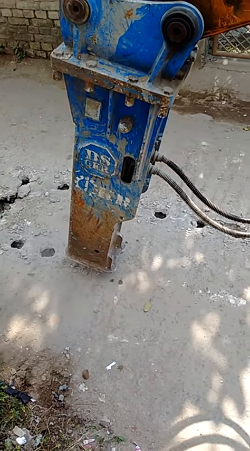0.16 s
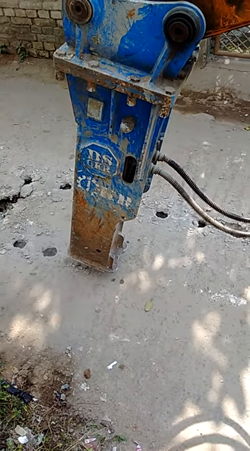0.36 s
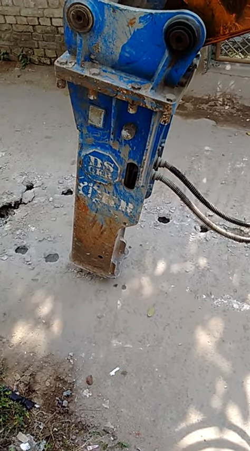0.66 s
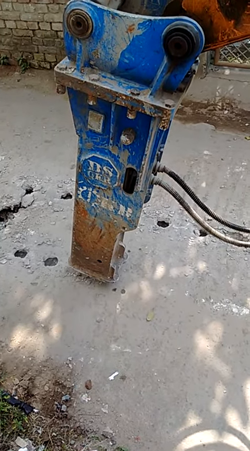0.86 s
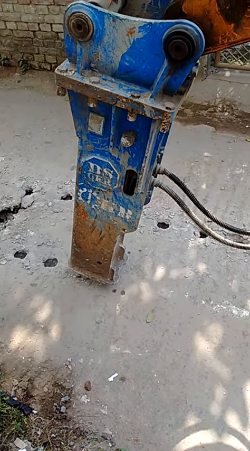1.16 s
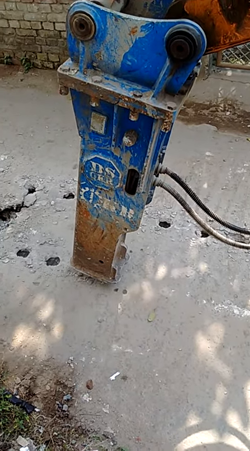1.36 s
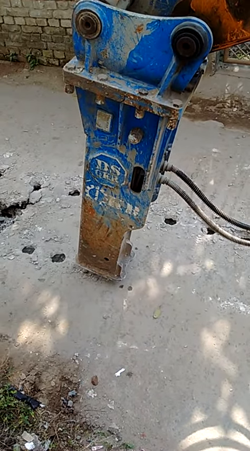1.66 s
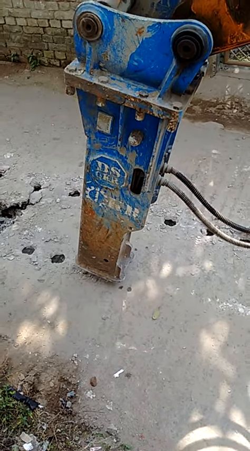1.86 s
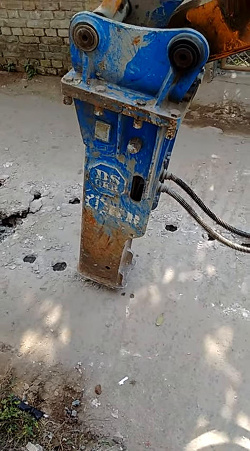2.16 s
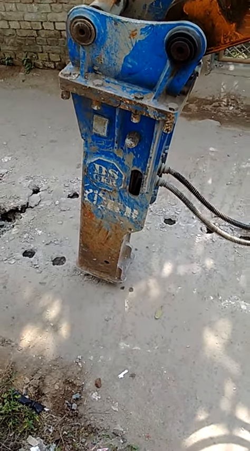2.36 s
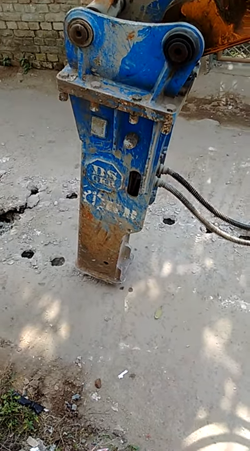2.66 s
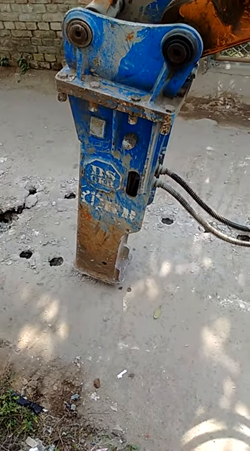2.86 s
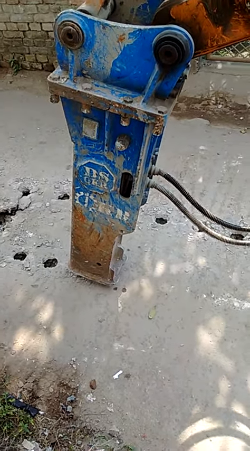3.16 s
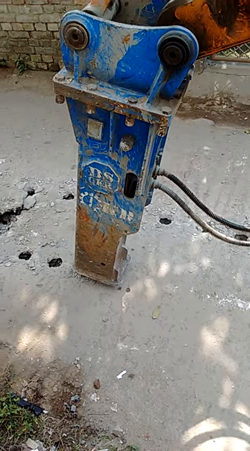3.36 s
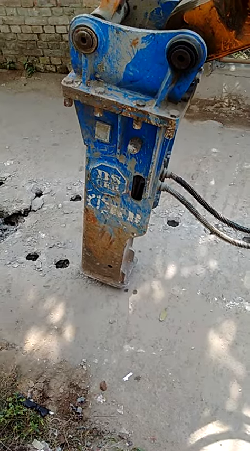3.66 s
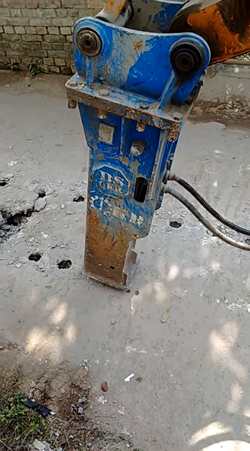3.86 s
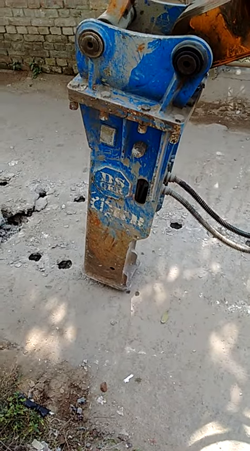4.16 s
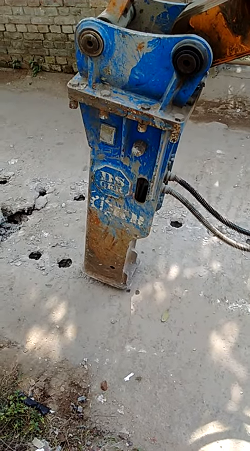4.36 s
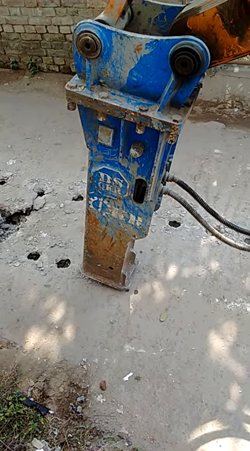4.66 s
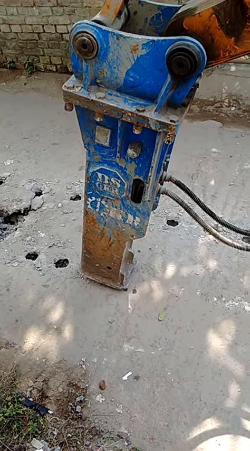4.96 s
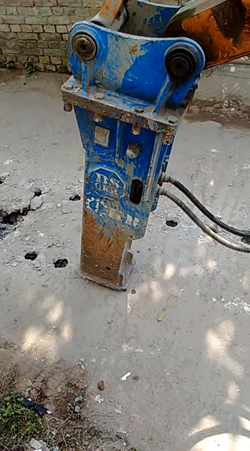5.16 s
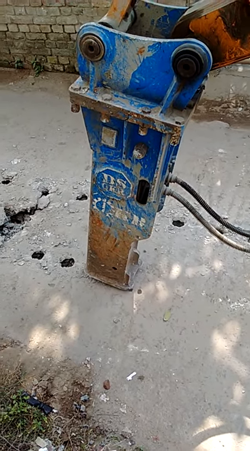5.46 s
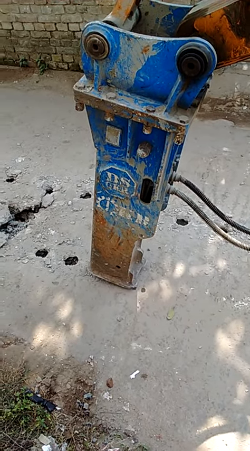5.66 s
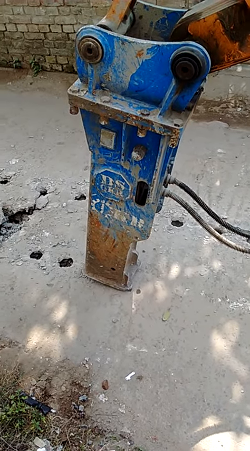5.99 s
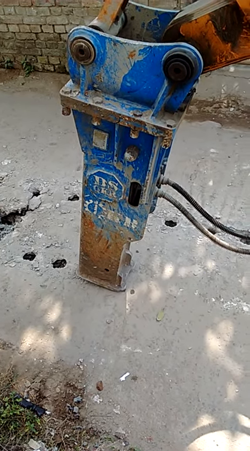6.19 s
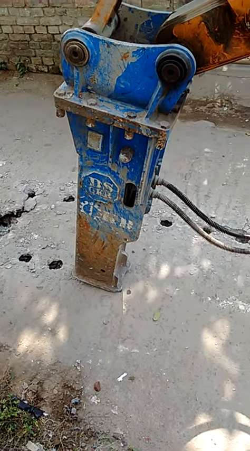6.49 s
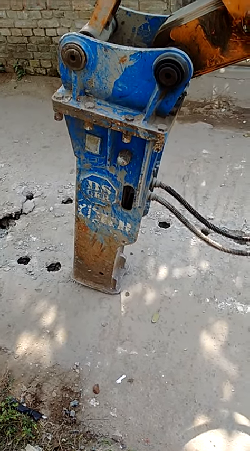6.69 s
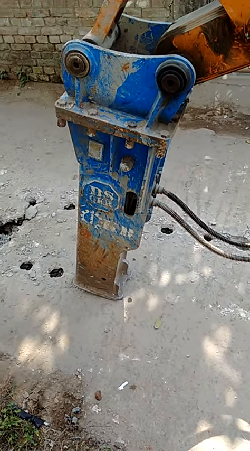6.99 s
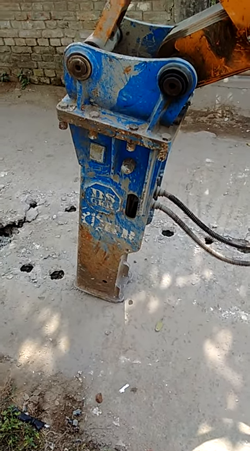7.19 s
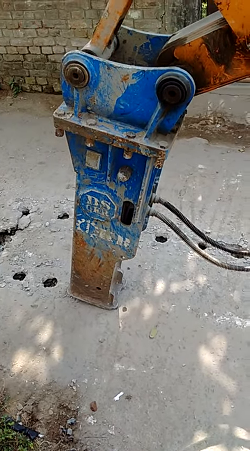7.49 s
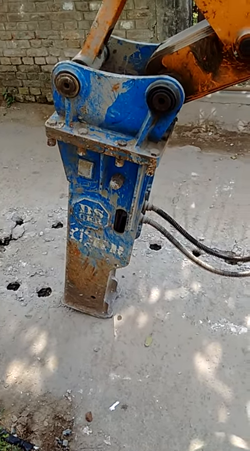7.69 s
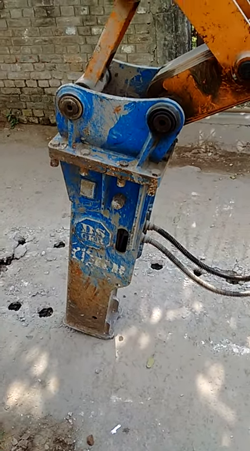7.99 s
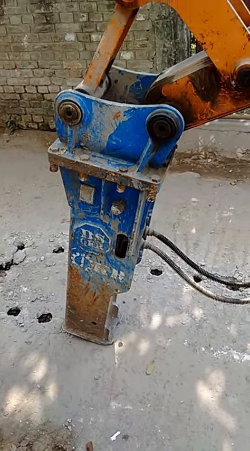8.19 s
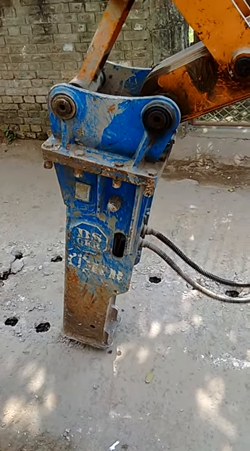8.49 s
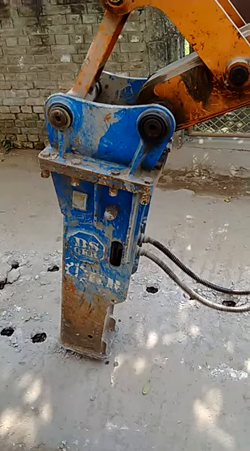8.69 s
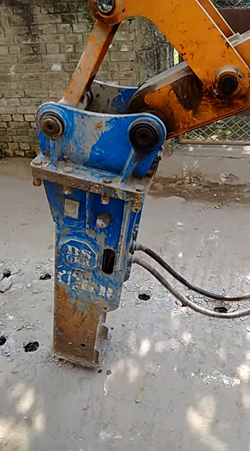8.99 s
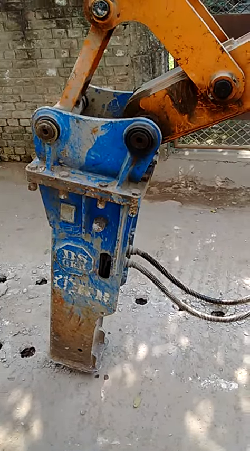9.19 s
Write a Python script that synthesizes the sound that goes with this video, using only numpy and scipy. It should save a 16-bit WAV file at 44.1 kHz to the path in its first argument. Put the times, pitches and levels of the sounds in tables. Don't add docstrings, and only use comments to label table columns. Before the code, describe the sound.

A rapid, steady stream of pounding metal-on-concrete blows starts at once, loud, rough and slightly distorted, with clanging housing and a wavering steel ring. It ends abruptly around seven seconds, uncovering a low humming engine. Slack pins knock, plates ring faintly, then a cluster of heavy thumps and a gritty chisel drag follows before only the drone remains. Close phone pickup, wide stereo, beside a brick wall.

```python
import sys
import numpy as np
from scipy import signal
from scipy.fft import rfft, irfft, next_fast_len
from scipy.io import wavfile
from scipy.ndimage import uniform_filter1d

SR = 44100
rng = np.random.default_rng(int(sys.argv[2]) if len(sys.argv) > 2 else 0)


def pcm_store(signal):
    levels = np.round(np.clip(np.atleast_2d(signal), -1, 1) * 32767)
    wavfile.write(sys.argv[1], SR, levels.astype(np.int16).T)


def voltage_ratio(decibels):
    exponent = np.asarray(decibels, float) / 20
    return 10 ** exponent


N = 411894

# [top edge f/Hz, level/dB, rise/s, t60/s, chatter exponent]
RATTLE_BANDS = [
    (501, 1.5, 0.0032, 0.17, 2.5),
    (1468, -1, 0.0025, 0.21, 1),
    (2530, -5.5, 0.00048, 0.2, 2),
    (6460, -2.5, 0.0031, 0.16, -0.8),
    (16400, -11, 0.0023, 0.14, 4.5),
]
PACE_S = [0.0195, 0.4491, 1.3013, 1.8704, 2.286, 2.5673, 2.7169, 2.8617, 3.0244, 3.5992, 3.8788, 4.4342,
          4.8526, 4.9906, 5.1406, 5.3033, 5.452, 5.5962, 6.0154, 6.153, 7.131]


def evened(x):
    return x / np.sqrt(np.mean(x ** 2) + 1e-20)


def smooth_noise(size, span):
    return evened(uniform_filter1d(rng.standard_normal(size), span))


def read(points, hz, axis=1):
    rows = np.array(points)
    return np.interp(np.log(hz + 1), np.log(rows[:, 0] + 1), rows[:, axis])


def add(mix, s, sound):
    part = mix[:, max(round(s * SR), 0):][:, :sound.shape[1]]
    part += sound[:, :part.shape[1]]


def coloured(size, points, tilt_db=0.):
    hz = np.fft.rfftfreq(size, 1 / SR)
    gain = voltage_ratio(read(points, hz) + tilt_db * np.log2((hz + 50) / 1000))
    return evened(irfft(rfft(rng.standard_normal((2, size))) * gain, size))


def bands(x):
    hz, z = np.fft.rfftfreq(x.shape[1], 1 / SR), rfft(x)
    edges = [0] + [row[0] for row in RATTLE_BANDS]
    return [evened(irfft(z * ((hz >= lo) & (hz < hi)), x.shape[1])) for lo, hi in zip(edges, edges[1:])]


def struck(t, rise_s, t60_s):
    return (1 - np.exp(-t / max(rise_s, 1e-4))) * voltage_ratio(-60 * t / t60_s)


def lumps(size, depth_db, span_s):
    span = int(span_s * SR)
    once = uniform_filter1d(rng.standard_normal(size), span)
    return voltage_ratio(depth_db * evened(uniform_filter1d(once, span)))


def ring(kicks, hz, t60_s):
    pole = voltage_ratio(-60 / (t60_s * SR)) * np.exp(2j * np.pi * hz / SR)
    return signal.lfilter([1], [1, -pole], kicks).imag


def blows():
    # [t/s, strength/dB, crumble/dB re strength, arm ring/dB re strength]
    bite = [(0, -17, -1.5, -23), (0.3, -15.5, -1.5, -30), (0.9, -16.5, -0.5, -24), (1.7, -17, 2, -40),
            (1.87, -15, 1.2, -18), (2.43, -15.5, 2, -14), (2.7, -16.5, 2.5, -16.5),
            (2.86, -17.5, -0.5, -13), (3.3, -17.5, 0, -16.5), (3.6, -13.5, -2.5, -16), (4.71, -14, -3, -17),
            (4.86, -14, -3, -36), (5.14, -16, -2.5, -30), (5.45, -14, -3, -24), (5.6, -13.5, -3.5, -15),
            (6.43, -16, -2, -19), (7.13, -14.1, -4, -22.5)]
    stroke_s = 0.142
    strokes = np.cumsum(np.append(0, np.round(np.diff(PACE_S) / stroke_s)))
    s = np.interp(np.arange(strokes[-1] + 1), strokes, PACE_S)
    at, *controls = np.transpose(bite)
    db, crumble_db, boom_db = (np.interp(s, at, c) for c in controls)
    luck = rng.standard_normal((len(s), 3)).T
    thud_db = -17.5 - 0.5 * s - db - 1.17 * luck[0]
    pinned_s, pinned_db_per_s = 6.18, -4.5
    plates_db = -0.17 + 0.9 * crumble_db + pinned_db_per_s * np.maximum(s - pinned_s, 0) + luck[1]
    return np.transpose([s, db, thud_db, plates_db, crumble_db, boom_db + 3 * luck[2]])


def rattle(rows):
    # [f/Hz, level/dB per Hz]
    shudder_colour = [(40, -7.5), (90, -2.5), (160, 0.5), (300, 3), (500, -2), (900, -2), (1500, -8),
                      (2000, -11), (2600, -15.5), (4000, -20.5), (6000, -24), (9000, -25.5), (12000, -29.5),
                      (15000, -29)]
    # [f/Hz, level/dB, peak t/s, half length/s]
    contact = [
        (1900, 0, .0018, .0013),
        (3200, -5, .001, .001),
        (330, -3, .0035, .0022),
        (65, -21, .013, .009),
    ]
    out, size = np.zeros((2, N)), 8192
    t = np.arange(size) / SR
    habit, habit_lumps = coloured(size, shudder_colour), lumps(size, 0.87, 0.0012)
    fade = np.minimum(5 * (1 - t / t[-1]), 1)
    for s, db, thud_db, plates_db, crumble_db, _ in rows:
        layers = bands(0.53 * habit + 0.91 * coloured(size, shudder_colour))
        shares_db = thud_db, plates_db, 0, 1.07 * crumble_db, crumble_db
        slower = voltage_ratio(0.84 * (crumble_db + 7))
        chatter = lumps(size, 0.4, 0.0025)
        shudder = np.zeros((2, size))
        for x, share_db, (_, band_db, rise_s, t60_s, depth_db) in zip(layers, shares_db, RATTLE_BANDS):
            shudder += voltage_ratio(share_db + band_db) * x * struck(t, rise_s, t60_s * slower) * chatter ** depth_db
        crack = np.zeros((2, size))
        for hz, part_db, at, half in contact:
            level = voltage_ratio(part_db + 2.0 * rng.standard_normal())
            phase = 2 * np.pi * hz * rng.uniform(0.95, 1.06) * (t - at) + [[0], [1.2]]
            crack += level * np.cos(phase) * np.exp(-((t - at) / half) ** 2)
        crack_db = db + 3.5 - .9 * crumble_db + .3 * s
        add(out, s - .0007, voltage_ratio(db + 3.5) * shudder * habit_lumps * fade + voltage_ratio(crack_db) * crack)
        puff = voltage_ratio(-48) * layers[2] + voltage_ratio(-11.5) * layers[3] + voltage_ratio(-16.0) * layers[4]
        add(out, s - .025, voltage_ratio(db) * puff[::-1] * struck(t, 0.003, 0.21))
    return out


def steel(rows):
    # [f/Hz, level/dB, t60/s, freest at t/s]
    steel_modes = [(248, -11, .25, 2.5), (295, -8, .2, 1.8), (334, -9, .25, 1), (397, -9, .33, 3.7),
                   (656, -7, .3, .6), (740, -7, .2, 1.1), (834, -8, .45, .7), (921, -6, .27, 1.6),
                   (1131, -8, .25, 3.2), (1126, -8, .28, 5.5), (1250, -8, .2, 5.9), (1455, -12, .2, 5.4),
                   (1630, -14, .2, 2),
                   (1725, -13, .2, 2.6), (1825, -9, .3, 1.5), (1958, -7.5, .2, 5.2), (2010, -14, .15, 2.3),
              (2300, -14, .15, 1), (3165, -19, .15, .4), (3740, -18, .15, 2.1), (4118, -18, .15, 2.1),
              (4581, -19, .15, 2.3), (7919, -28, .2, 2.2), (8635, -29, .3, 5), (9778, -25, .4, 3.5),
              (11590, -34, .4, 4.5), (13050, -36, .3, 4.5)]
    # [f/Hz, level/dB, wander/Hz]
    boom = (588, 3, 3.5)
    s, db, _, plates_db, _, boom_db = rows.T
    out = np.zeros((2, N))
    damped_db, free_db, free_s = -3, 7.5, 0.84
    for hz, mode_db, t60_s, freest_s in steel_modes:
        kicks = np.zeros((2, N), complex)
        drift_db = 1.3 * smooth_noise(len(s), 4)
        seating_db = damped_db + free_db * np.exp(-((s - freest_s) / free_s) ** 2 / 2) + drift_db
        shake_db = .7 * plates_db * (hz < 1400)
        for delay_s, bounce_db in (.002, -4), (.009, -10.5), (.021, -14.5):
            luck = rng.random((len(s), 3)).T
            height = voltage_ratio(db + 4 + shake_db + mode_db + bounce_db + seating_db + 4 * luck[0])
            kicks[:, ((s + delay_s) * SR).astype(int)] += height * np.exp(2j * np.pi * luck[1:])
        out += ring(kicks, hz, t60_s)
    boom_hz, gain_db, wander_hz = boom
    t = np.arange(N) / SR
    level = np.interp(t, np.append(s + 0.1, s[-1] + 0.35), np.append(voltage_ratio(db + boom_db + gain_db), 0))
    phase = 2 * np.pi * np.cumsum(boom_hz + wander_hz * smooth_noise(N, 6000)) / SR
    return out + level * lumps(N, 4.0, 0.032) * np.sin(phase + [[0], [.7]])


def linkage():
    # [t/s, level/dB, rise/s, t60/s, tilt/dB per octave]
    knocks = [(7.665, -19.5, 0.004, 0.6, -5), (7.825, -30, .005, 0.11, 0.5), (7.985, -28, 0.0043, 0.21, -3),
              (8.25, -17.5, 0.0035, 0.44, -2.5), (8.308, -12, 0.013, 0.32, -1),
              (8.522, -10, 0.0018, 0.11, -14.5), (8.56, -8.5, 0.005, 0.13, -7.5),
              (8.626, -14.5, .003, 0.28, 3.5), (8.754, -18, .004, 0.16, -3), (7.88, -39, 0.0033, 0.18, 7),
              (9.02, -33, 0.0083, .3, 0)]
    # [f/Hz, level/dB per Hz]
    knock_colour = [(60, -29), (150, -4.5), (300, -7), (600, -4), (1000, 1), (1800, -7.5), (3000, -6.5),
                    (5000, -14), (8000, -21), (12000, -27), (15000, -27.5)]
    # [t/s, f/Hz, level/dB, t60/s]
    plates = [(7.73, 312, -28, 4), (7.68, 1240, -30, .2), (7.82, 3596, -44, .8), (7.95, 3596, -42, 3),
              (7.82, 9785, -45, 1.5), (7.82, 9150, -52, .4), (7.79, 7300, -53, .5), (8.255, 820, -22, .2),
              (8.325, 1130, -14, .3), (8.308, 810, -14, .12), (8.33, 1950, -22, .15), (8.7, 330, -30, 1),
              (7.67, 470, -22, .15), (7.68, 1700, -27, .2), (8.33, 3100, -20, .2), (8.41, 3596, -39, .6),
              (8.52, 9785, -40, 1.2), (8.53, 200, -23, .3), (8.755, 597, -31, 1.6), (8.755, 1000, -20, .15),
              (8.63, 3900, -28, .12), (8.6, 13800, -46, .5), (8.25, 4800, -34, .15), (8.7, 3600, -42, 1.3),
              (8.35, 4800, -35, .2)]
    # [t/s, level/dB, centre f/Hz]
    scrape = [
        (8.52, -3, 251),
        (8.535, -26, 269),
        (8.596, -9, 1380),
        (8.642, -12.5, 2030),
        (8.692, -32, 1530),
        (8.716, -25, 849),
        (8.8, -16.5, 1040),
    ]
    out, t = np.zeros((2, N)), np.arange(22050) / SR
    for s, db, rise_s, t60_s, tilt_db in knocks:
        noise = coloured(len(t), knock_colour, tilt_db)
        add(out, s, voltage_ratio(db + 1.0) * noise * struck(t, rise_s, t60_s) * lumps(len(t), 0.93, 0.0055))
    t = np.arange(SR) / SR
    for s, hz, db, t60_s in plates:
        phase = 2 * np.pi * (hz * t + rng.random() * np.ones((2, 1)))
        add(out, s, voltage_ratio(db) * np.sin(phase) * struck(t, .006, t60_s) * lumps(SR, 1.5, .015) * (1 - t))
    s, db, hz = np.transpose(scrape)
    t = np.arange(s[0], s[-1], 1 / SR)
    grit = coloured(len(t), knock_colour, 1.2)
    turn = np.exp(2j * np.pi * np.cumsum(np.interp(t, s, hz)) / SR)
    r = np.exp(-np.pi * 900 / SR)
    climbing = evened((turn * signal.lfilter([1 - r], [1, -r], grit / turn)).real)
    drag = (.65 * climbing + .75 * grit) * lumps(len(t), 2.2, .003) * signal.windows.tukey(len(t), .15)
    add(out, s[0], voltage_ratio(np.interp(t, s, db) - 7.0) * drag)
    return out


def wall(x):
    t = np.arange(SR // 2) / SR
    tail = rng.standard_normal((2, len(t))) * voltage_ratio(-60 * t / .5) * (t > .012)
    tail = signal.lfilter([.4], [1, -.6], tail)
    return voltage_ratio(-16) * signal.oaconvolve(x, tail / np.linalg.norm(tail[0]), axes=1)[:, :N]


def engine():
    # [t/s, level/dB]
    engine_level = [(0, -40.5), (4, -40.5), (5.6, -32), (7.1, -37), (7.62, -38.5), (7.7, -32.5), (8.2, -33),
                    (8.45, -28), (8.97, -35), (9.05, -33), (9.34, -29)]
    # [f/Hz, level/dB per Hz]
    drone_colour = [(40, -1), (90, -6), (160, 1), (300, -4), (500, -4), (900, -6.5), (1500, -9),
                    (2000, -9.5), (2600, -17.5), (4000, -24.5), (6000, -36), (9000, -37.5), (12000, -41.5),
                    (15000, -44)]
    s, db = np.transpose(engine_level)
    t = np.arange(N) / SR
    _, _, z = signal.stft(coloured(N, drone_colour), SR, nperseg=512)
    patches = uniform_filter1d(rng.standard_normal(z.shape[1:]), 6, 0)
    patches = evened(uniform_filter1d(patches, 12, 1))
    drone = evened(signal.istft(z * voltage_ratio(1.9 * patches), SR, nperseg=512)[1][:, :N])
    drone = drone * lumps(N, 1.16, 0.0079)
    phase = 2 * np.pi * np.cumsum(129.2 + 1.9 * smooth_noise(N, 4000)) / SR
    hum = np.sin(phase + [[0], [.6]]) * lumps(N, 1.8, 0.05)
    hiss = voltage_ratio(-29) * coloured(N, [(6000, -30), (9500, -3), (11000, 0), (15500, -4)])
    hammering_db, after_db, swell_s = -16, -2.5, 0.2
    hum_db = np.interp(t, [PACE_S[-1], PACE_S[-1] + swell_s], [hammering_db, after_db])
    return voltage_ratio(np.interp(t, s, db)) * (voltage_ratio(3.5) * (drone + hiss) + voltage_ratio(hum_db) * hum)


def scene():
    rows = blows()
    machine = rattle(rows) + steel(rows) + linkage()
    return machine + wall(machine) + engine()


def masked(x):
    # [f/Hz, level/dB]
    cell_floor = [(4000, -30), (6000, -8.5), (9500, -11), (10400, -5), (15000, -3.5)]
    # [f/Hz, level/dB]
    patch_floor = [(9000, -75), (9400, -51), (13000, -48), (15500, -43)]
    growth = 1.4
    hz, _, z = signal.stft(np.array([x[0] + x[1], x[0] - x[1]]) / 2, SR, nperseg=1024)
    power = abs(z) ** 2
    around = uniform_filter1d(power.sum(0), size=30, axis=0)
    cell = uniform_filter1d(uniform_filter1d(power, size=3, axis=1), size=2, axis=2)
    keep = cell > around * voltage_ratio(read(cell_floor, hz))[:, None] ** 2
    patch = uniform_filter1d(uniform_filter1d(power, size=9, axis=1), size=2, axis=2)
    loudness = uniform_filter1d(power.sum((0, 1)), size=10)
    keep &= patch > loudness ** growth * voltage_ratio(read(patch_floor, hz))[:, None] ** 2
    mid, side = signal.istft(z * keep * (hz < 15650)[:, None], SR, nperseg=1024)[1][:, :N]
    return np.array([mid + side, mid - side])


def band_limit(x):
    return signal.sosfilt(signal.butter(12, 15650, fs=SR, output="sos"), x)


def record(dry):
    # [f/Hz, right re left/dB, likeness 0-1, share cancelled from the other side]
    capsules = [(60, -4, .7, .1), (170, -3.5, .1, .05), (300, -4.5, .45, .05), (420, -.5, .65, .05),
                (560, -5, .2, .2), (1000, -8, .1, .4), (1950, 0, .15, .58), (2500, -7, .1, .56),
                (3800, -1, .1, .46), (5000, -8, .1, .36), (6500, -2.5, .1, .52), (8000, -1.5, .1, .64),
                (9300, -1.5, .1, .7), (9750, -2.5, .1, .3), (10500, -4, .1, .25), (11500, -9, .1, .05),
                (15000, -10.5, .1, .03)]
    # [f/Hz, lag/rad]
    lag = [(60, 3), (150, 2.5), (280, 1), (400, 1.9), (520, 2.8), (700, 3.8), (1000, 5.4)]
    cancel_s = 14 / 44100
    size = next_fast_len(N + 64)
    hz, (left, other) = np.fft.rfftfreq(size, 1 / SR), rfft(dry, size)
    same = np.clip(read(capsules, hz, axis=2), -1, 1)
    right = same * left * np.exp(-1j * read(lag, hz)) + np.sqrt(1 - same ** 2) * other
    right = voltage_ratio(read(capsules, hz)) * right
    cancel = read(capsules, hz, axis=3) * np.exp(-2j * np.pi * hz * cancel_s)
    wide = irfft(np.array([left - cancel * right, right - cancel * left]), size)[:, :N]
    wide = signal.sosfilt(signal.butter(2, 70, "high", fs=SR, output="sos"), wide)
    heard = masked(np.clip(wide, -1.2, 1.2))
    return band_limit(np.clip(heard, -1, 1))


dry = scene()
out = record(dry)
pcm_store(out)
```